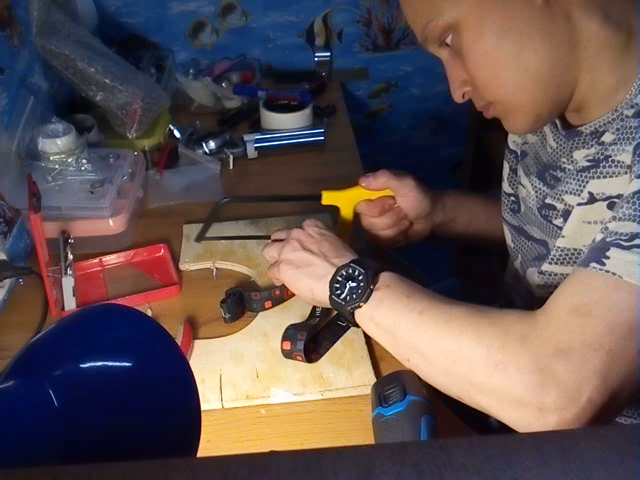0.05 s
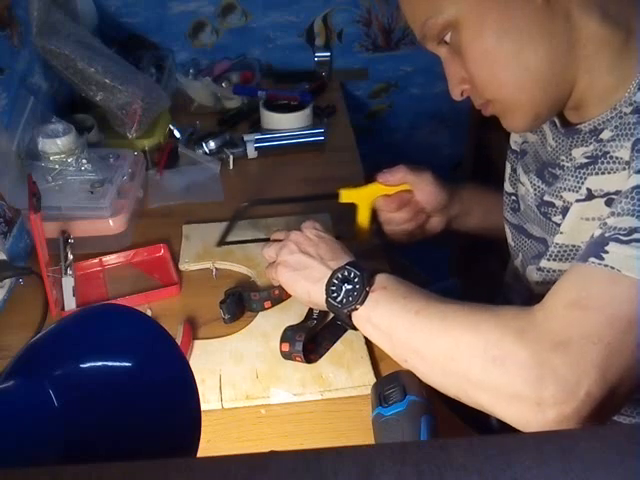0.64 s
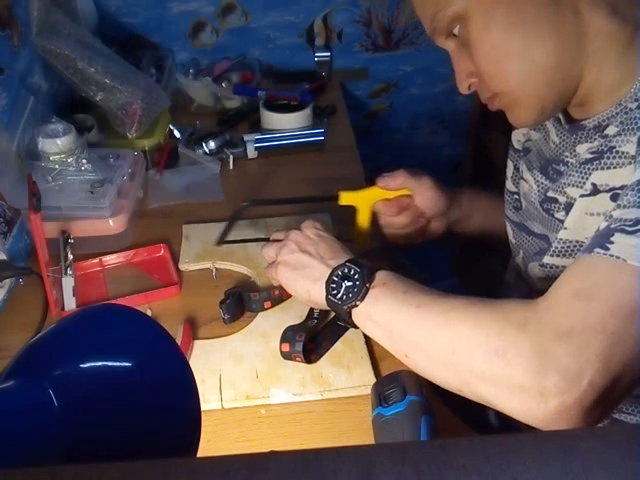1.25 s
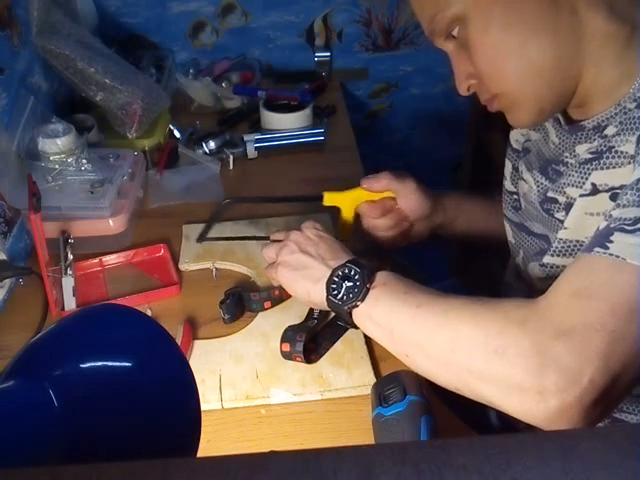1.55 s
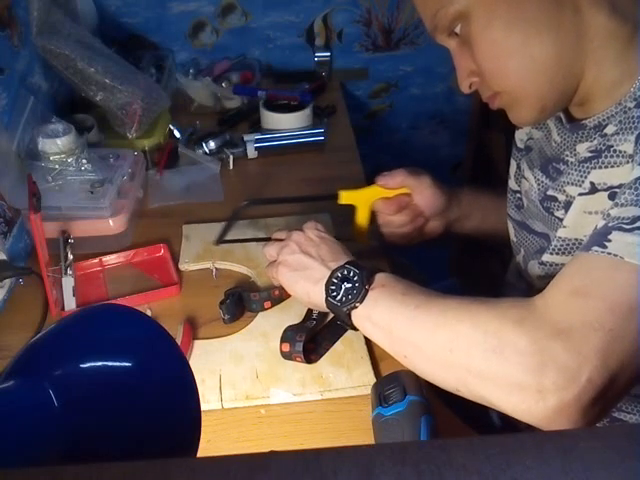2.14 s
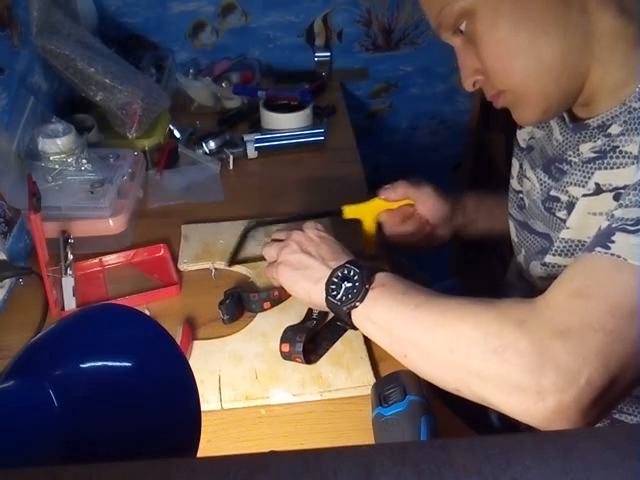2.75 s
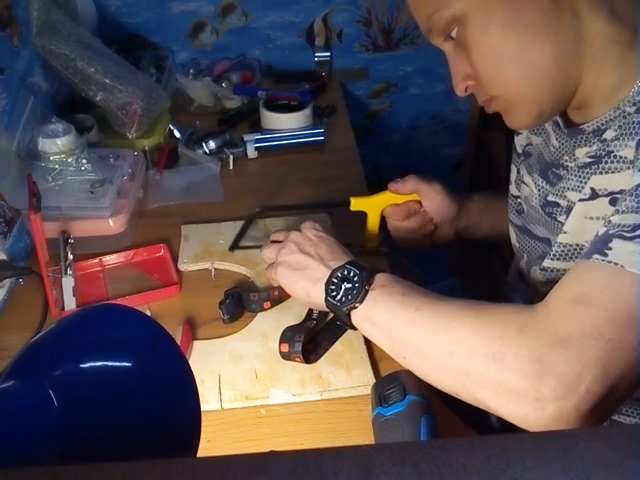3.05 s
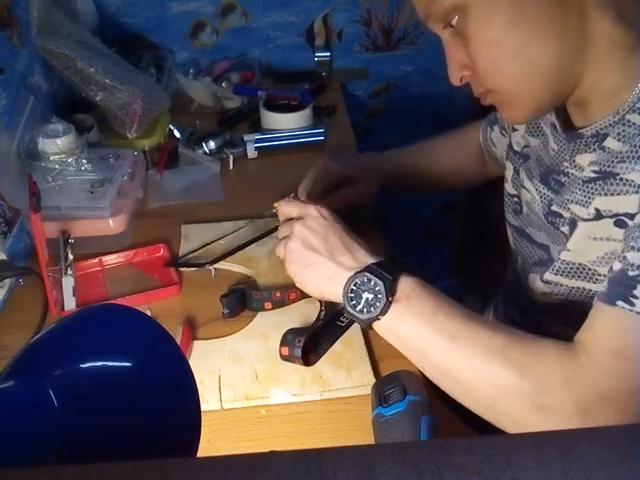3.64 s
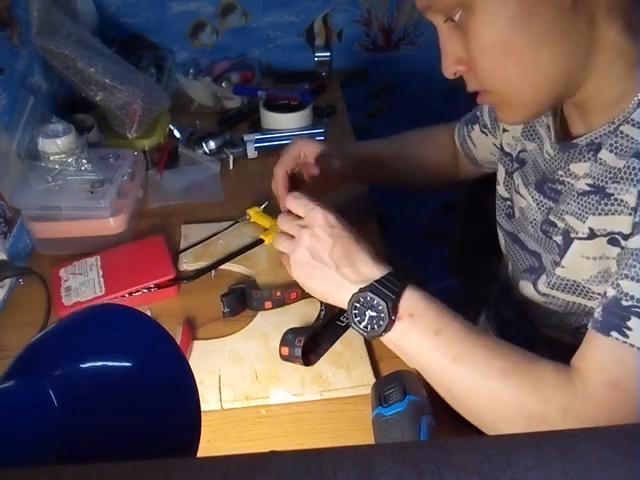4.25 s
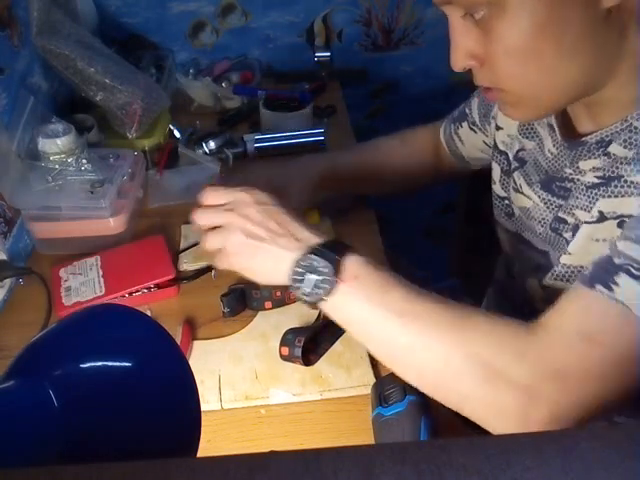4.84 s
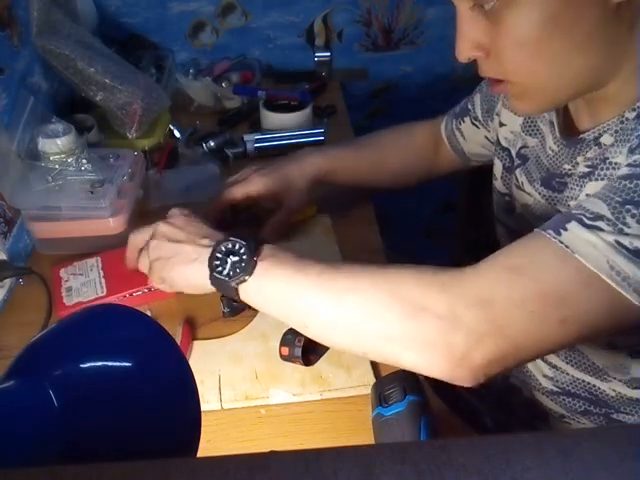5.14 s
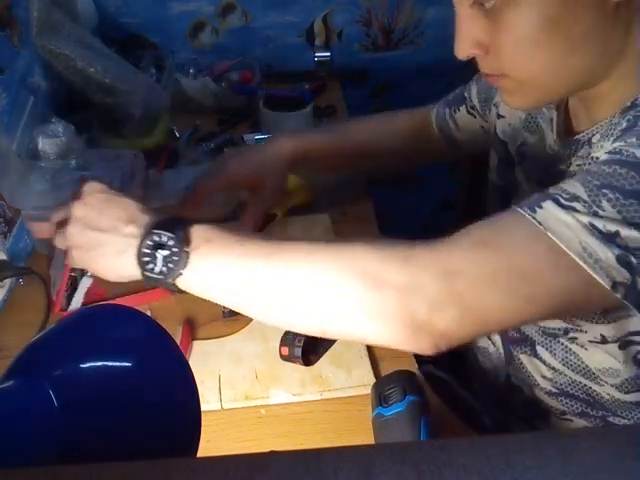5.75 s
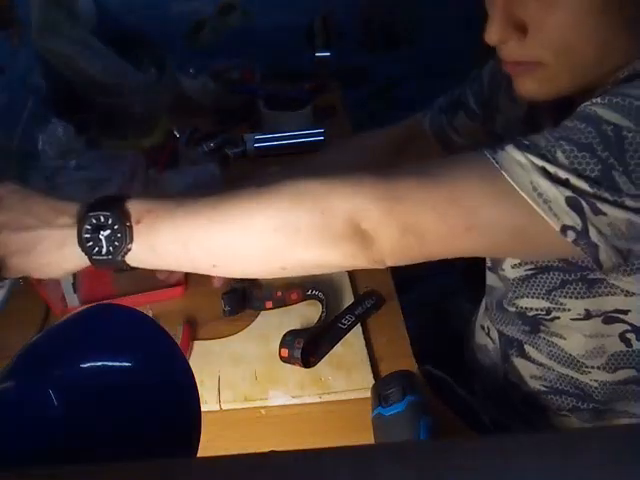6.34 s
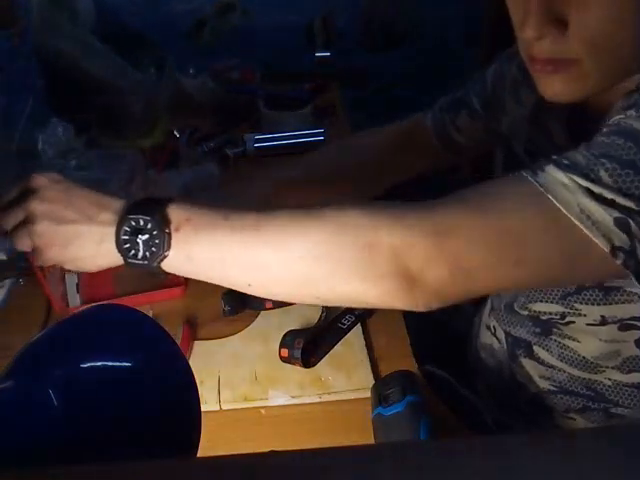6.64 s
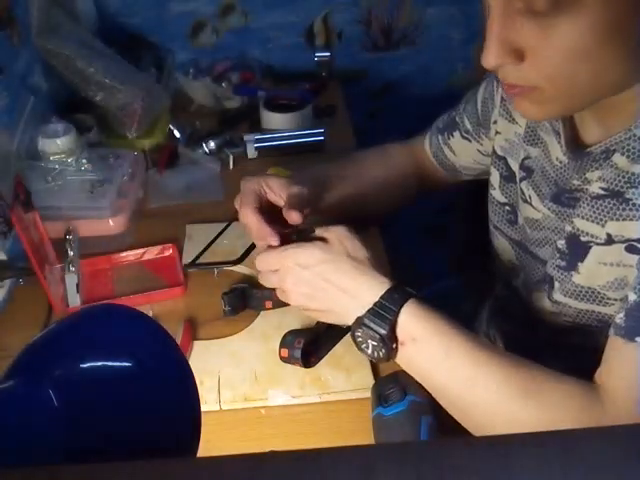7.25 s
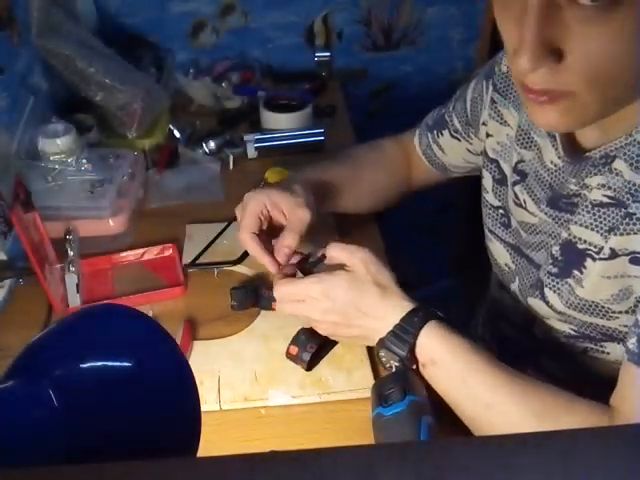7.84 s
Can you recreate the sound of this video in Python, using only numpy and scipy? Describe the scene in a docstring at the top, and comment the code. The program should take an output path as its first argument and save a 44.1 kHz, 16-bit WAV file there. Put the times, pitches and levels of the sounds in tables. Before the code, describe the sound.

A small hacksaw rasps quickly back and forth through thin plastic while the wooden desk rumbles underneath. After about three seconds the piece cracks off, and the steel saw clinks as it is put down. A plastic box tips over with a loud clatter, then scrapes, squeaks and knocks as it is slid and set upright. Fingers softly rub the parts. It sounds close, in a small dry room with a faint electrical hum.

```python
"""A small hacksaw rasps quickly to and fro through thin plastic, each tooth tearing off a chip,
while the wooden desk beneath rumbles along. Near 2.9 s the piece cracks off; the steel saw clinks
as it is put down. Just after 4 s a plastic box tips over, then scrapes, squeaks and knocks as it is
slid and set upright. Hands rub over the parts and bump the desk. Throughout: a small dry room
with a faint mains hum, all dull above 7 kHz."""
import sys
import numpy as np
from scipy import signal
from scipy.fft import rfft, irfft, next_fast_len
from scipy.io import wavfile
from scipy.ndimage import uniform_filter1d, map_coordinates

SR = 44100
rng = np.random.default_rng(int(sys.argv[2]) if len(sys.argv) > 2 else 0)


def materialize(psi):
    """Save the field psi as 16-bit PCM at rate SR to the path in sys.argv[1].

    A 1-D psi becomes a single channel; in a 2-D psi each row is a channel.
    """
    bounded = np.clip(np.atleast_2d(psi).T, -1, 1)
    quanta = np.round(bounded * 32767).astype(np.int16)
    wavfile.write(sys.argv[1], SR, quanta)


N = 353152

# saw strokes, pull and push in turn: turn t/s, rasp/dB, tooth catch/dB, desk jolt/dB
SAW_STROKES = [(0.013, -47, -56, -36), (.209, -46, -49.5, -28), (.379, -47, -51.5, -48),
               (0.587, -47, -46.5, -38), (.773, -47.5, -51.5, -36), (.963, -47.5, -53.5, -43),
               (1.143, -49.5, -55, -42), (1.346, -47, -66, -42), (1.524, -49.5, -54, -40.5),
               (1.712, -46.5, -78, -58), (1.893, -51, -55, -33.5), (2.082, -46.5, -78, -34),
               (2.264, -48, -55.5, -33.5), (2.462, -45, -52.5, -36.5), (2.623, -46, -69, -39),
               (2.824, -43.5, -56, -34)]
# modes of the plastic, sheet and box alike: f/Hz, level/dB
PLASTIC_MODES = [(260, -8.5), (495, -18.5), (700, -8.5), (965, -6.5), (1249, -1.5), (1372, -3.5),
                 (1431, -4.5), (1750, -5), (2875, -6), (3360, -10.5), (4047, -11.5), (4595, 1),
                 (5544, -8.5), (5676, -4.5), (5840, -4.5), (6157, -9), (6312, 3.5)]


def amp(db):
    """Decibels to gain."""
    return 10 ** (np.asarray(db) / 20)


def unit(x):
    """Scale to rms 1."""
    return x / np.sqrt(np.mean(x ** 2) + 1e-20)


def along(points, hz):
    """Read (f/Hz, value) points on a log frequency axis."""
    f, v = np.transpose(points)
    return np.interp(np.log(hz + 1), np.log(f + 1), v)


def add(track, s, sound):
    """Mix a sound into the track from time s on."""
    start = max(round(s * SR), 0)
    track[start:start + len(sound)] += sound[:len(track) - start]


def colour(x, spectrum, peaks=(), peak_db=0):
    """Minimum-phase filter: spectrum (f/Hz, level/dB) with peaks (f/Hz, width/Hz, level/dB) on it."""
    m = 2 * next_fast_len(len(x) // 2 + 4096)
    hz = np.fft.rfftfreq(m, 1 / SR)
    lift = 1 + sum(amp(db + peak_db) / (1 + (2 * (hz - f) / width) ** 2) for f, width, db in peaks)
    cepstrum = irfft(np.log(amp(along(spectrum, hz)) * lift))
    cepstrum[1:m // 2] *= 2
    cepstrum[m // 2 + 1:] = 0
    return irfft(rfft(x, m) * np.exp(rfft(cepstrum)))[:len(x)]


def room(x, wet_db, early_t60_s=0.12, early_db=5):
    """Direct sound, quick echoes off the cluttered desk and the room's tail, at unchanged power."""
    # room decay: f/Hz, t60/s
    decay_times = [(100, 0.31), (1000, 0.3), (6000, 0.28), (12000, 0.21)]
    hz, t, noise = signal.stft(rng.standard_normal(SR // 2), SR, nperseg=256)
    decay = amp(-60 * t / along(decay_times, hz)[:, None]) + amp(early_db - 60 * t / early_t60_s)
    tail = signal.istft(noise * decay, SR, nperseg=256)[1]
    response = amp(wet_db) * tail / np.linalg.norm(tail)
    response[0] += 1
    return signal.fftconvolve(x, response / np.linalg.norm(response))[:len(x)]


def background(hum_hz=50, hum_db=-63, air_db=-72):
    """Mains hum over the faint hiss of the room."""
    # room hiss: f/Hz, level/dB
    air_spectrum = [(45, -24.5), (95, 0), (160, -8), (240, -10), (350, -15), (570, -19), (1100, -20),
                    (2000, -19), (3200, -23.5), (4300, -23), (5700, -19), (6500, -21.5), (7100, -34.5),
                    (8200, -37), (15500, -41)]
    hum = np.sqrt(2) * np.sin(2 * np.pi * hum_hz * np.arange(N) / SR)
    air = unit(colour(rng.standard_normal(N), air_spectrum))
    return amp(hum_db) * hum + amp(air_db) * air


def finger_brushing():
    """Skin rubs over plastic in short soft swipes."""
    # finger swipes: t/s, length/s, level/dB
    swipes = [(4.535, 0.055, -62), (4.872, 0.12, -70.5), (5.024, 0.094, -66), (6.6, 0.067, -65.5),
              (6.692, 0.076, -54.5), (6.817, 0.054, -62.5), (7.276, 0.028, -58.5), (7.296, 0.068, -53.5),
              (7.376, 0.066, -54.5), (7.669, 0.058, -65.5)]
    # skin friction: f/Hz, level/dB
    spectrum = [(300, -15.5), (1300, -10), (2100, 2.5), (3000, -8.5), (4000, -2.5), (5800, 3), (6800, -1),
                (8200, -36), (15000, -50)]
    envelope = np.zeros(N)
    for s, length_s, db in swipes:
        add(envelope, s, amp(db) * np.sin(np.linspace(0, np.pi, int(length_s * SR))))
    friction = unit(colour(grit(per_s=5600, spread_db=1), spectrum))
    return room(envelope * friction, wet_db=-3.5)


def hand_bumps(t60_s=0.16, rise_s=0.0025):
    """A hand lands softly on the desk: a dull thud without pitch."""
    # hand landings: t/s, level/dB
    landings = [(3.415, -49), (5.781, -39), (7.425, -51.5), (7.849, -59.5)]
    # desk thud: f/Hz, level/dB
    spectrum = [(40, -19), (90, 5), (140, 6.5), (200, -2), (290, -13), (450, -32), (1500, -34),
                (5000, -73.5)]
    out, t = np.zeros(N), np.arange(SR // 4) / SR
    envelope = (1 - np.exp(-t / rise_s)) * amp(-60 * t / t60_s)
    for s, db in landings:
        thud = colour(rng.standard_normal(len(t)), spectrum) * envelope
        add(out, s, amp(db) * thud / np.std(thud[:SR // 30]))
    return out


def box_squeaks(waver=0.09, octave_db=-11.5):
    """An edge of the dragged box sticks and slips at a gliding, unsteady pitch."""
    # squeaks: t/s, length/s, start f/Hz, end f/Hz, level/dB
    glides = [(5.563, 0.023, 1236, 1190, -40), (5.606, 0.0447, 1045, 827, -46.5),
              (5.679, 0.0465, 1212, 1400, -52.5)]
    out = np.zeros(N)
    for s, length_s, start_hz, end_hz, db in glides:
        progress = np.linspace(0, 1, int(length_s * SR))
        wobble = unit(uniform_filter1d(rng.standard_normal(len(progress)), size=60))
        pitch_hz = (start_hz + (end_hz - start_hz) * progress) * (1 + waver * wobble)
        phase = 2 * np.pi * np.cumsum(pitch_hz) / SR
        tone = np.sin(phase) + amp(octave_db) * np.sin(2 * phase)
        add(out, s, amp(db) * unit(np.sqrt(progress) * (1 - progress) * tone))
    return room(out, wet_db=0)


def grit(per_s, spread_db):
    """Friction: tiny impacts of random size, rms 1."""
    impacts = (rng.random(N) < per_s / SR) * rng.standard_normal(N)
    return unit(impacts * amp(spread_db * rng.standard_normal(N)))


def sliding():
    """Plastic scrapes over the desk, swelling and fading with each movement of the hand."""
    # slides: t/s, length/s, scrape/dB, hiss/dB
    moves = [(3.24, 0.088, -60.5, -52.5), (3.314, 0.18, -89, -66.5), (3.867, 0.3, -52, -58),
             (4.124, 0.074, -38, -38.5), (5.121, 0.22, -64.5, -57), (5.187, 0.222, -43, -48.5),
             (5.504, 0.18, -50, -50.5), (5.675, 0.15, -50, -55), (5.989, 0.35, -61.5, -55.5),
             (6.304, 0.17, -69.5, -64.5)]
    # low scrape of the body: f/Hz, level/dB
    scrape_spectrum = [(50, -25), (120, 6), (200, 6), (290, 8.5), (420, -9), (750, -4), (1300, -4.5),
                       (2100, -10), (3000, -6.5), (6000, -51.5)]
    # surface hiss: f/Hz, level/dB
    hiss_spectrum = [(1200, -25.5), (2200, -9), (3000, -6), (4600, 0), (6100, 2.5), (6900, -3.5),
                     (8200, -28), (15000, -48.5)]
    body_peaks = [(720, 48, 2.5), (1400, 160, -1.5)]
    scrape_gain, hiss_gain = np.zeros((2, N))
    for s, length_s, scrape_db, hiss_db in moves:
        speed = np.abs(np.sin(np.linspace(0, np.pi, int(length_s * SR)))) ** 0.87
        add(scrape_gain, s, amp(scrape_db) * speed)
        add(hiss_gain, s, amp(hiss_db) * speed)
    scrape = unit(colour(grit(per_s=1200, spread_db=6), scrape_spectrum, body_peaks, peak_db=-2.5))
    hiss = unit(colour(grit(per_s=230, spread_db=4.5), hiss_spectrum))
    return room(scrape_gain * scrape + hiss_gain * hiss, wet_db=9)


def blows(hits, spectrum, modes, contact_t60_s, ring_t60_s, rise_s, ring_db, wet_db, split_hz=450):
    """A short crack rings the object's modes and thuds in the desk; harder contact has more treble."""
    out, t = np.zeros(N), np.arange(SR // 2) / SR
    lowpass = signal.butter(4, split_hz, 'lowpass', fs=SR, output='sos')
    highpass = signal.butter(4, split_hz, 'highpass', fs=SR, output='sos')
    attack = slice(0, SR // 50)
    for s, db, treble_db, thud_db in hits:
        contact = rng.standard_normal(len(t)) * amp(-60 * t / contact_t60_s)
        crack = room(colour(contact, spectrum), wet_db)
        ring = sum(amp(mode_db + rng.normal(0, 3.7)) * np.sin(2 * np.pi * (hz * t + rng.random()))
                   for hz, mode_db in modes)
        ring *= amp(-60 * t / ring_t60_s)
        hit = crack / np.std(crack[attack]) + amp(ring_db) * ring / np.std(ring[attack])
        hit *= 1 - np.exp(-t / rise_s)
        tilt = [(2200, 0), (5800, treble_db), (15000, treble_db + 2 * min(treble_db, 0))]
        clack = colour(signal.sosfilt(highpass, hit), tilt)
        thud = signal.sosfilt(lowpass, hit)
        add(out, s, amp(db) * clack / np.std(clack[attack]) + amp(thud_db) * thud / np.std(thud[attack]))
    return out


def saw_clinks():
    """The steel frame rings briefly as the saw is put down."""
    # clinks: t/s, level/dB, treble/dB, desk thud/dB
    hits = [(3.05, -40, 5.5, -69.5), (3.122, -42.5, 6.5, -85), (3.228, -54, 0.5, -89),
            (3.789, -18, 0, -36.5), (5.724, -50.5, -0.5, -54), (6.085, -64, 11, -54.5),
            (6.154, -47.5, -1, -52)]
    # steel contact: f/Hz, level/dB
    spectrum = [(60, -8.5), (240, -7), (400, -21), (740, -14), (2000, -12), (3200, -9.5), (4500, -5.5),
                (5050, -2.5), (5700, 1.5), (6400, 0), (7000, -12), (8500, -30), (15500, -40.5)]
    # saw frame modes: f/Hz, level/dB
    steel_modes = [(3700, -17.5), (4960, -6.5), (5130, -15), (5400, -5.5), (5660, -16.5), (6150, -36.5),
                   (6300, 5), (6490, -35)]
    return blows(hits, spectrum, steel_modes,
                 contact_t60_s=0.012, ring_t60_s=0.1, rise_s=0.002, ring_db=-15, wet_db=0.5)


def box_knocks():
    """The plastic box strikes the desk: bright on a hard corner, dull on a flat side."""
    # knocks: t/s, level/dB, treble/dB, desk thud/dB
    hits = [(4.061, -35.5, -13, -39.5), (4.082, -44, -5, -46), (4.157, -11, 0, -26.5),
            (4.173, -16.5, 4.5, -37), (4.218, -15.5, 0, -29.5), (5.276, -51, -1.5, -45),
            (5.331, -27.5, -6.5, -43), (5.494, -50.5, -21, -59), (5.764, -40.5, -13, -44),
            (5.777, -31.5, -11, -40.5), (5.819, -33, -11, -38), (6.232, -44.5, -13, -49)]
    # box contact: f/Hz, level/dB
    spectrum = [(40, -17), (100, 6), (175, -6), (255, -4.5), (400, -17), (500, -16), (760, -9.5),
                (1080, -11.5), (1500, -1.5), (2300, -10), (3200, -4.5), (4300, -5), (6150, 2.5),
                (8300, -24.5), (15500, -34)]
    return blows(hits, spectrum, PLASTIC_MODES,
                 contact_t60_s=0.025, ring_t60_s=0.22, rise_s=0.004, ring_db=-11, wet_db=4)


def sheet_break():
    """The sheet cracks and breaks through during the last stroke."""
    # cracks: t/s, level/dB, treble/dB, desk thud/dB
    hits = [(2.863, -48.5, -2.5, -44), (2.878, -34, 6.5, -36.5), (2.904, -23.5, -3, -31),
            (2.92, -26.5, -3.5, -29)]
    # fracture: f/Hz, level/dB
    spectrum = [(50, -11), (95, 12.5), (150, 5.5), (200, -7.5), (290, -7), (420, -17.5), (600, -7.5),
                (1050, -13), (1550, -7), (2300, -12), (3500, -14.5), (6200, -5.5), (8300, -33.5),
                (15500, -48.5)]
    return blows(hits, spectrum, PLASTIC_MODES,
                 contact_t60_s=0.02, ring_t60_s=0.17, rise_s=0.00089, ring_db=-14, wet_db=1)


def desk_rumble(rumble_gain, judder_hz=103, judder_db=-5, boom_hz=88.3, rise_s=0.012, delay_s=0.01478):
    """The desk shudders under the strokes as the sheet judders, and booms just after each turn."""
    # desk shudder: f/Hz, level/dB
    spectrum = [(30, -63), (65, -24.5), (90, 6.5), (118, 2.5), (160, -7.5), (220, -16.5), (300, -8),
                (390, -28), (480, -38), (900, -66)]
    wobble = unit(uniform_filter1d(rng.standard_normal(N), size=1200))
    pitch_hz = judder_hz * np.exp(0.1024 * wobble)
    judder = amp(judder_db) * unit(np.sin(2 * np.pi * np.cumsum(pitch_hz) / SR))
    shudder = unit(colour(grit(per_s=400, spread_db=1), spectrum))
    out = rumble_gain * unit(judder + shudder)
    t = np.arange(SR // 4) / SR
    swell = (t / rise_s) * np.exp(1 - t / rise_s)
    for s, _, _, jolt_db in SAW_STROKES:
        overtone_hz = 1.6 * boom_hz * np.exp(0.041 * rng.standard_normal())
        boom = np.sin(2 * np.pi * boom_hz * t) + amp(-11) * np.sin(2 * np.pi * overtone_hz * t)
        add(out, s + delay_s, amp(jolt_db) * swell * boom)
    return out


def blade_catches(t60_s=0.01):
    """The blade catches: at a turn mostly the sheet knocks, in mid-stroke mostly the steel ticks."""
    # mid-stroke snags: t/s, level/dB
    snags = [(0.0869, -41), (.162, -45), (0.8381, -44), (1.3762, -46.5), (1.8533, -41.5), (2.6, -49.5)]
    knock_spectrum = [(200, -8.5), (900, -5.5), (1300, 2), (1750, 8), (2800, -10.5), (4000, 2),
                      (5500, -27), (8500, -47)]
    tick_spectrum = [(2000, -14), (4100, 2.5), (6200, 5), (7200, -7.5), (8500, -35.5), (15000, -50)]
    at_turns = [(s, db + 2.5, db - 1) for s, _, db, _ in SAW_STROKES]
    mid_stroke = [(s, db - 4, db + 2.5) for s, db in snags]
    out, t = np.zeros(N), np.arange(SR // 20) / SR
    for s, knock_db, tick_db in at_turns + mid_stroke:
        burst = rng.standard_normal(len(t)) * amp(-60 * t / t60_s)
        for spectrum, db in (knock_spectrum, knock_db), (tick_spectrum, tick_db):
            part = colour(burst, spectrum)
            add(out, s, amp(db) * part / np.std(part[:SR // 200]))
    return room(out, wet_db=8.5)


def stroke_motion(stop_s=2.99, rest_s=0.008, lead_s=0.006, pull_rumble_db=-47, push_rumble_db=-41):
    """Speed and bite (0-1), rasp and rumble gains: the blade rests at turns, digs in as a push starts."""
    speed, bite, rasp_gain, rumble_gain = np.zeros((4, N))
    ends_s = [row[0] for row in SAW_STROKES[1:]] + [stop_s]
    for k, ((turn_s, rasp_db, _, _), end_s) in enumerate(zip(SAW_STROKES, ends_s)):
        pushing = k % 2 == 1
        s = turn_s - lead_s  # the blade creeps before its teeth catch
        progress = np.linspace(0, 1, int((end_s - turn_s - rest_s) * SR))
        skew = 0.88 if pushing else 0.84  # below 1: speed peaks early
        arc = np.abs(np.sin(np.pi * progress ** skew))
        add(speed, s, arc)
        add(bite, s, pushing / (1 + (2.5 * progress) ** 6))
        add(rasp_gain, s, amp(rasp_db) * arc ** (1.05 if pushing else 1.35))
        add(rumble_gain, s, amp(push_rumble_db if pushing else pull_rumble_db) * arc ** 0.53)
    return speed, bite, rasp_gain, rumble_gain


def saw_rasp(speed, bite, rasp_gain, nominal_tooth_hz=850, chip_db=1, slow_db=-1, bite_db=-1.5):
    """Each tooth tears off a chip while the flank rubs; a slow blade is duller, a biting one hollow."""
    # rasp of the cut: f/Hz, level/dB
    spectrum = [(150, -26.5), (330, -6), (480, -7), (1030, -13.5), (1250, 0), (2000, -5), (2600, -8),
                (2800, -10.5), (3350, -13), (3650, -6), (5600, 0), (6600, -5), (8400, -44), (15000, -56.5)]
    # resonances of blade and sheet: f/Hz, width/Hz, level/dB
    kerf_peaks = [(1335, 320, -11), (1583, 132, -3.5), (2438, 110, -1), (3633, 140, -3.5),
                  (4030, 240, -2.5), (4640, 333, -4.5), (5410, 82, 5), (5760, 250, -2.5),
                  (6290, 175.7, -8.5), (7840, 140, 9.5)]
    slow_eq = [(1000, 5.5), (1600, 1), (2900, 3.5), (4500, -1), (5400, -3.5), (7000, 0.5)]
    bite_eq = [(700, -3), (1400, 1.5), (2300, -3.5), (2800, -12), (3200, -2), (3700, 2), (4450, 5),
               (5300, -2.5), (6500, -2)]
    tooth_hz = nominal_tooth_hz * speed * np.exp(0.67 * rng.standard_normal(N))
    teeth_passed = np.floor(np.cumsum(tooth_hz) / SR)
    chips = np.diff(teeth_passed, prepend=0) * amp(1.9 * rng.standard_normal(N)) * rng.choice([-1, 1], N)
    force = grit(per_s=7000, spread_db=5) + amp(chip_db) * chips * np.sqrt(SR / nominal_tooth_hz) / 2
    # the next tooth meets the same roughness: a faint gliding pitch
    one_tooth_ago = np.arange(N) - SR / (nominal_tooth_hz * (speed + 0.1))
    force = force + amp(-8) * force[np.clip(one_tooth_ago, 0, N - 1).astype(int)]
    cut = unit(colour(force, spectrum, kerf_peaks, peak_db=-1))
    brisk = speed ** 2.1
    gliding = brisk * cut + amp(slow_db) * (1 - brisk) * colour(cut, slow_eq)
    rasp = (1 - bite) * gliding + amp(bite_db) * bite * colour(cut, bite_eq)
    # the teeth grip unevenly: 70 random levels a second
    grip_db = map_coordinates(rng.standard_normal(N // 400), [np.arange(N) * 70 / SR], mode='wrap')
    return room(amp(grip_db) * rasp_gain * rasp, wet_db=-3)


def scene():
    """Sawing, the break, then tidying up; mono."""
    speed, bite, rasp_gain, rumble_gain = stroke_motion()
    sawing = saw_rasp(speed, bite, rasp_gain) + blade_catches() + desk_rumble(rumble_gain)
    impacts = sheet_break() + box_knocks() + saw_clinks() + hand_bumps()
    rubbing = sliding() + box_squeaks() + finger_brushing()
    return (sawing + impacts + rubbing + background())[None]


def record(dry):
    """Clip at full scale, then cut everything above the band limit."""
    top_hz = 15700
    m = next_fast_len(N + SR // 2)
    passband = np.fft.rfftfreq(m, 1 / SR) < top_hz
    return irfft(rfft(np.clip(dry, -1, 1), m) * passband, m)[..., :N]


dry = scene()
out = record(dry)
materialize(out)
```